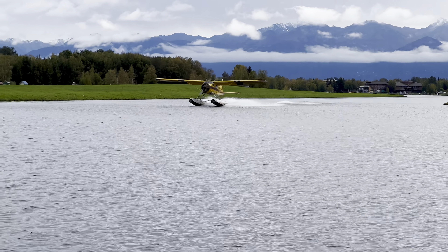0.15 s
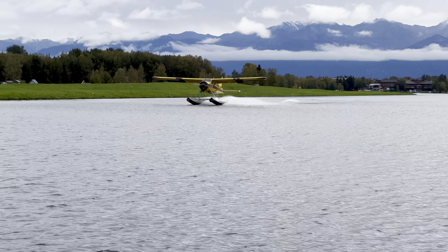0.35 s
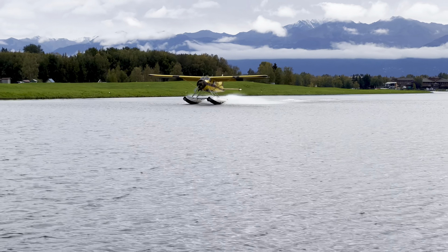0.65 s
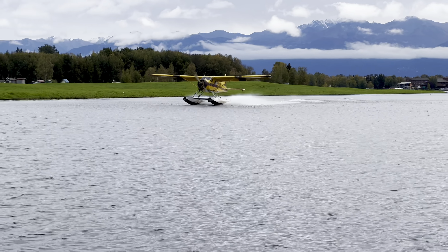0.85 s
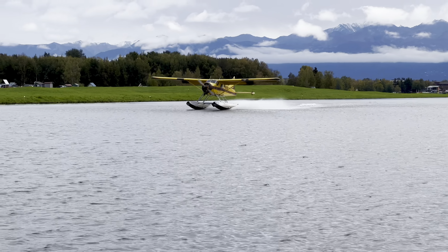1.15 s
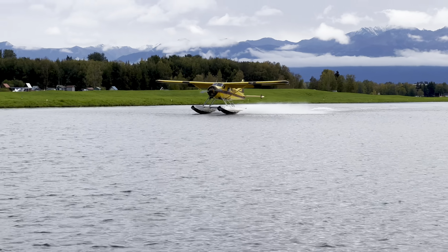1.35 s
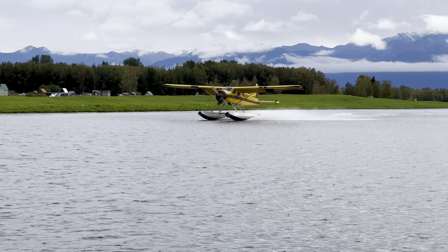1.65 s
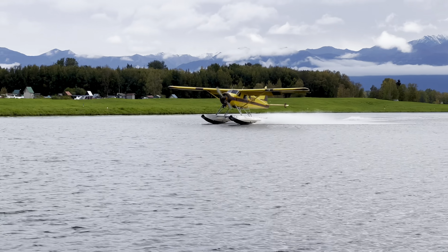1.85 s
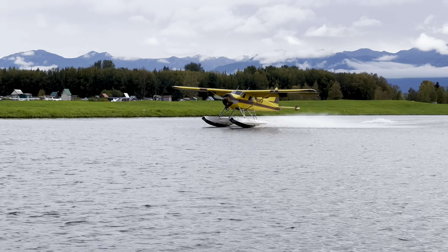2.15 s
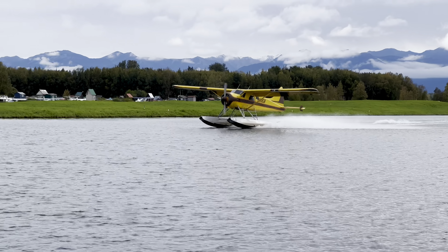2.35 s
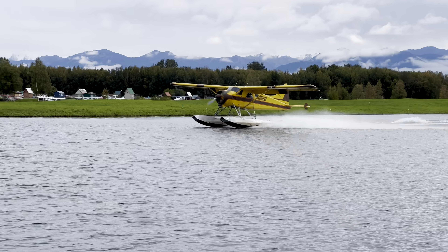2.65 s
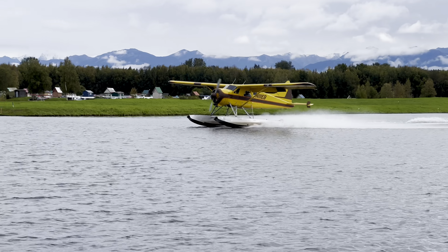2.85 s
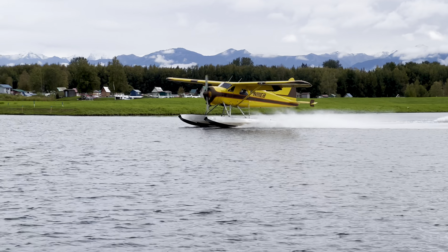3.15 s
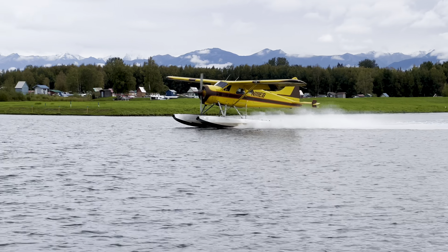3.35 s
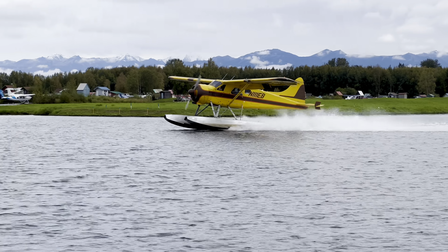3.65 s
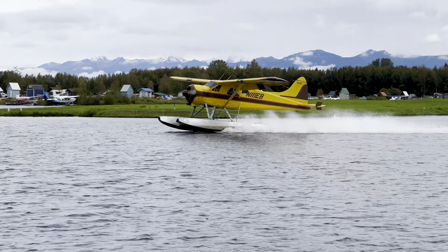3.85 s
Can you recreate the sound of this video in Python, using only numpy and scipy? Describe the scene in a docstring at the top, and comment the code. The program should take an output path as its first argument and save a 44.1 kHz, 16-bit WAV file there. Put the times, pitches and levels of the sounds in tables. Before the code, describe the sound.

Floatplane propeller engine drones low and sinks in pitch, fading under rushing water and spray

```python
"""Floatplane nearing the shore

A piston-engined floatplane skims across a lake and draws level with the shore. Sine waves make the
propeller hum, which sinks in pitch; uneven pulses and noise make the ragged exhaust, which falls to a mutter.
Flickering noise makes the rush, churning and growing spray of the floats; short noise bursts are their slaps.
Wind thumps (slow swings) and rasps (noise) on the microphone, among faint noise ticks. Noise rumbles back
from the shore, and near the end a narrow, hollow engine drone swells and eases."""
import sys
import numpy as np
from scipy import signal
from scipy.fft import rfft, irfft
from scipy.io import wavfile

SR = 44100
rng = np.random.default_rng(int(sys.argv[2]) if len(sys.argv) > 2 else 0)


def dump(signal):
    """Clip the signal to [-1, 1] and save it as 16-bit WAV at the path in sys.argv[1]."""
    limited = np.clip(np.atleast_2d(signal).T, -1, 1)
    pcm = np.round(limited * 32767).astype(np.int16)
    wavfile.write(sys.argv[1], SR, pcm)


N = 176400  # 4 seconds
TIME = np.arange(N) / SR
FREQUENCY = np.maximum(np.fft.rfftfreq(N, 1 / SR), 1)  # Hz, kept above zero


def from_db(db):
    """Turn decibels into a gain."""
    return 10 ** (np.asarray(db) / 20)


def rms_one(x):
    """Scale a signal to an average strength (rms) of 1."""
    return x / np.sqrt(np.mean(x ** 2) + 1e-20)


def in_time(rows):
    """Join the points of a table by straight lines, with a value for every sample."""
    return np.interp(TIME, *np.transpose(rows))


def gains(points):
    """Turn a table of frequencies and decibels into a gain for every frequency."""
    hz, db = np.transpose(points)
    return from_db(np.interp(np.log(FREQUENCY), np.log(hz), db))


def coloured(x, points):
    """Make some frequencies stronger than others, then scale to rms 1."""
    return rms_one(irfft(rfft(x) * gains(points), N))


def drift(rate):
    """A smooth random wander around zero with rms 1; a higher rate (Hz) wanders faster."""
    step = 40  # samples between the computed points
    r = np.exp(-2 * np.pi * rate * step / SR)
    chance = rng.standard_normal(N // step + 2002)
    slow = signal.lfilter([1], [1, -2 * r, r * r], chance)[2000:]  # drop the filter's start
    return np.interp(np.arange(N) / step, np.arange(len(slow)), rms_one(slow))


def band(x, low_hz, high_hz, order=2):
    """Keep only the frequencies between two limits, then scale to rms 1."""
    limits = [low_hz, min(high_hz, SR / 2 - 1)]
    sos = signal.butter(order, limits, "band", fs=SR, output="sos")
    return rms_one(signal.sosfilt(sos, x))


def noise():
    """Two unrelated white noises: the direct sound and its scattered part."""
    return rng.standard_normal((2, N))


def water_noise(spectrum, flutter_db, patchy_db):
    """Countless splashes: bands of noise that flicker on their own and surge together."""
    edges = np.geomspace(60, 16000, 9)
    bands = np.zeros((2, N))
    for low, high in zip(edges, edges[1:]):
        flicker = from_db(patchy_db * drift(15.0))
        bands += band(noise(), low, high) * np.sqrt(high - low) * flicker
    surge = from_db(flutter_db * drift(50))
    return rms_one(coloured(bands, spectrum) * surge)


# How often a propeller blade comes round: (t/s, f/Hz)
BLADE_RATE = [(0, 97.54), (.4, 94.56), (.9, 91.79), (1.4, 88.5), (1.9, 85.7), (2.35, 81.36), (2.65, 77.2),
              (3.15, 72.84), (3.6, 69.64), (4, 67.3)]


def blades_passed():
    """Add up the falling blade rate into a running count of blades."""
    return np.cumsum(in_time(BLADE_RATE)) / SR


# Loudness of the propeller hum: (t/s, level/dB)
HUM_LEVEL = [(0, -18), (.3, -21), (.8, -15.5), (.94, -19.5), (1.1, -14), (1.7, -18.5), (2.2, -17.5),
             (2.47, -26), (2.61, -21), (2.72, -32), (3.1, -34), (3.4, -37), (4, -35)]
HUM_WAVER_DB, HUM_WAVER_RATE_HZ, HUM_WAVER_RADIANS = 2, 12.3, 0.3
SECOND_HARMONIC_DB = -19
HUM_SCATTER_DB, HUM_SCATTER_RATE_HZ = -4.5, 4.4


def propeller(blades):
    """A nearly pure hum at the blade rate, wavering on its way over the water, and its scattered part."""
    phase = 2 * np.pi * blades + HUM_WAVER_RADIANS * drift(HUM_WAVER_RATE_HZ)
    hum = np.sin(phase) + from_db(SECOND_HARMONIC_DB) * np.sin(2 * phase)
    direct = rms_one(hum * from_db(HUM_WAVER_DB * drift(HUM_WAVER_RATE_HZ)))
    scattered = drift(HUM_SCATTER_RATE_HZ) * np.sin(phase)
    scattered += drift(HUM_SCATTER_RATE_HZ) * np.cos(phase)
    both = np.array([direct, from_db(HUM_SCATTER_DB) * scattered])
    return both * from_db(in_time(HUM_LEVEL))


# Loudness of the exhaust: (t/s, level/dB)
EXHAUST_LEVEL = [(0, -25), (.3, -22.5), (.55, -22), (.75, -21.5), (1.1, -22.5), (1.35, -22), (1.55, -18.5),
                 (1.72, -19.5), (2.2, -19), (2.58, -15.5), (2.69, -29), (2.9, -31), (3.2, -30), (3.7, -36),
                 (4, -31.5)]
# Colour the pipe gives the exhaust: (f/Hz, level/dB per Hz)
EXHAUST_COLOUR = [(20, -48), (32, -36.5), (45, -8.5), (65, 3), (100, -3.5), (140, -7.5), (200, -5.5),
                  (250, -10.5), (305, -22), (360, -14), (450, -29), (700, -33.5), (1500, -79), (9000, -77),
                  (13000, -110)]
FIRINGS_PER_BLADE = 1.5
FIRING_SPREAD_DB, FIRING_JITTER_S = 6, 0.001
GAS_SHARE = 0.68  # share of the direct power that is turbulent gas; the rest is pulses
EXHAUST_FLUTTER_DB, EXHAUST_FLUTTER_RATE_HZ = 2, 34


def exhaust(firings):
    """Uneven firing pulses and turbulent gas, coloured by the pipe."""
    at = np.flatnonzero(np.diff(np.floor(firings)))  # one pulse at each whole count
    timing, strength = rng.standard_normal((2, len(at)))
    at = np.clip(at + (FIRING_JITTER_S * SR * timing).astype(int), 0, N - 1)
    pulses = np.zeros(N)
    pulses[at] = from_db(FIRING_SPREAD_DB * np.clip(strength, -2, 2))
    gas = coloured(noise(), EXHAUST_COLOUR)
    direct = np.sqrt(1 - GAS_SHARE) * coloured(pulses - pulses.mean(), EXHAUST_COLOUR)
    direct += np.sqrt(GAS_SHARE) * gas[0]
    flutter = from_db(EXHAUST_FLUTTER_DB * drift(EXHAUST_FLUTTER_RATE_HZ))
    return rms_one(np.array([direct, gas[1]]) * flutter) * from_db(in_time(EXHAUST_LEVEL))


# Loudness of the floats rushing through the water: (t/s, level/dB)
WASH_LEVEL = [(0, -36), (.55, -35), (.75, -30.5), (.99, -36.5), (1.07, -32.5), (1.35, -33.5), (1.6, -32),
              (1.88, -30.5), (2.2, -34), (2.5, -31), (2.78, -31.5), (2.92, -34.5), (3.2, -35.5),
              (3.32, -33), (3.55, -35.5), (3.82, -33), (4, -33.5)]
# Colour of that rush: (f/Hz, level/dB per Hz)
WASH_COLOUR = [(100, -30), (300, -1), (450, -4), (600, 0.5), (900, -1), (1300, -4), (1600, -3), (1850, -8),
               (2200, -9.5), (2600, -15), (3100, -14), (4000, -20), (5200, -25.5), (6200, -28.5),
               (7500, -34), (9000, -36.5), (11000, -50), (16000, -82)]


def wash():
    """The floats rush through the water, as flickering noise."""
    return from_db(in_time(WASH_LEVEL)) * water_noise(WASH_COLOUR, flutter_db=0.87, patchy_db=0.98)


# Loudness of the deep churning behind the floats as they settle: (t/s, level/dB)
CHURN_LEVEL = [(0, -35), (2, -36.5), (2.7, -35.5), (3.05, -41), (3.35, -36), (3.7, -40), (3.82, -32),
               (4, -30.5)]
# Colour of the churning: (f/Hz, level/dB per Hz)
CHURN_COLOUR = [(70, -32), (150, -2), (220, 2), (300, 7), (380, -1.5), (460, -12), (610, -2), (780, -37),
                (1000, -36), (2000, -58.5)]


def churn():
    """Water churns behind the floats, as deep flickering noise."""
    return from_db(in_time(CHURN_LEVEL)) * water_noise(CHURN_COLOUR, flutter_db=-1.5, patchy_db=0.7)


# Loudness of the spray, which grows as the floats come nearer: (t/s, level/dB)
SPRAY_LEVEL = [(0, -54.5), (.3, -55.5), (.45, -52), (.6, -64), (.76, -51), (.95, -62), (1.1, -68),
               (1.45, -57), (1.8, -49.5), (2.25, -47.5), (2.65, -43.5), (3, -45), (3.25, -43.5),
               (3.55, -45), (3.85, -41.5), (4, -41)]
# Colour of the spray: (f/Hz, level/dB per Hz)
SPRAY_COLOUR = [(800, -16), (2000, 3.5), (3100, 2.5), (4000, 0.5), (5200, -4), (6200, -1.5), (7400, -8),
                (8700, -5.5), (9700, -12.5), (11300, -6.5), (12500, -19.5), (13500, -43), (16000, -58.5)]


def spray():
    """Fine drops hiss, as bright flickering noise."""
    return from_db(in_time(SPRAY_LEVEL)) * water_noise(SPRAY_COLOUR, flutter_db=1, patchy_db=0.56)


# Loudness of the rumble scattered back from the shore: (t/s, level/dB)
SHORE_LEVEL = [(0, -56), (1, -40.5), (2, -33.5), (2.6, -30), (3.1, -39), (3.5, -30.5), (4, -31.5)]
# Colour of that rumble: (f/Hz, level/dB per Hz)
SHORE_COLOUR = [(20, -14), (45, 4.5), (70, 8.5), (110, 4), (200, 2.5), (330, -0.5), (450, -9), (650, -6.5),
                (1000, -27.5), (2000, -29), (5000, -69), (13000, -100)]


def shore():
    """A rumble from all sides: unrelated noise in the two channels."""
    return from_db(in_time(SHORE_LEVEL)) * coloured(noise(), SHORE_COLOUR)


# Deep wind thumps: (t/s at the top, half length/s, level/dB, f/Hz)
THUMPS = [(0.397, 0.02, -20, 63), (0.576, 0.023, -24, 59.6), (1.57, 0.019, -27, 59.6),
          (1.69, 0.013, -19.5, 65), (1.851, .02, -12.5, 70), (2.396, .022, -19, 63.3),
          (2.577, 0.052, -17.5, 71.3), (3.982, 0.006, -24.5, 153)]
THUMP_WAVER_RATE_HZ, THUMP_WAVER_RADIANS = 62, 0.3


def thumps():
    """Large eddies push on the microphone: a few slow swings of pressure each."""
    waver = THUMP_WAVER_RADIANS * np.array([drift(THUMP_WAVER_RATE_HZ), drift(THUMP_WAVER_RATE_HZ)])
    waver += rng.uniform(0, 2 * np.pi, (2, 1))
    out = np.zeros((2, N))
    for s, half, db, hz in THUMPS:
        swell = np.exp(-.5 * ((TIME - s) / half) ** 2)
        swing = np.sqrt(2) * np.sin(2 * np.pi * hz * (TIME - s) + waver)
        out += from_db(db) * swell * swing
    return out


# Faint ticks near the microphone: (t/s, level/dB at the start)
TICKS = [(0.408, -33.5), (0.422, -37), (0.436, -35.5), (1.055, -44), (1.4375, -36), (2.023, -46)]
# Colour of a tick: (f/Hz, level/dB per Hz)
TICK_COLOUR = [(1000, -8), (2500, 14.5), (5000, -3), (7500, 4), (9000, -2), (12500, -10.5), (15500, -20)]
TICK_FADE_S = 0.0036


def ticks():
    """Thin, sharp ticks close by: bright noise that starts at once and quickly dies away."""
    envelope = np.zeros(N)
    for s, db in TICKS:
        envelope += from_db(db) * (TIME >= s) * np.exp(-np.abs(TIME - s) / TICK_FADE_S)
    return coloured(noise(), TICK_COLOUR) * envelope


# Wind rasps on the microphone: (t/s, length/s, level/dB, centre f/Hz)
BUFFETS = [(0.554, 0.018, -25.5, 253), (1.765, .012, -22.5, 287), (1.83, 0.026, -18.5, 375),
           (2.006, 0.025, -26, 320), (2.297, .024, -21, 335), (2.352, 0.0064, -15.5, 376),
           (2.427, 0.034, -16, 388), (2.464, 0.013, -11.5, 370), (2.487, 0.024, -17.5, 380),
           (2.52, 0.038, -22, 380), (2.563, .08, -24, 238), (2.655, 0.0076, -20.5, 310),
           (2.679, 0.027, -21, 420), (2.71, 0.0089, -18.5, 458), (2.726, 0.018, -21, 408),
           (2.763, .006, -20, 400), (2.77, 0.011, -21, 480), (2.792, 0.0078, -17.5, 466),
           (2.846, 0.01, -22.5, 413)]
# Colour of a rasp: (multiple of the centre frequency, level/dB per Hz)
BUFFET_COLOUR = [(.1, -17), (.35, -2.5), (.8, 2.5), (1.35, -2.5), (1.9, -13), (2.6, -22), (5, -54),
                 (15, -79)]
BUFFET_ATTACK_S, BUFFET_RELEASE_S = 0.0052, 0.011
BUFFET_RAGGED_DB, BUFFET_RAGGED_RATE_HZ = 1, 87


def buffets():
    """Wind rasps across the microphone: short, ragged pieces of noise."""
    out = np.zeros((2, N))
    air = noise()
    ragged = from_db(BUFFET_RAGGED_DB * drift(BUFFET_RAGGED_RATE_HZ))
    for s, length, db, hz in BUFFETS:
        attack = np.clip((TIME - s) / BUFFET_ATTACK_S, 0, 1)
        release = np.exp(-np.maximum(TIME - s - length, 0) / BUFFET_RELEASE_S)
        envelope = attack * release
        colour = [(hz * multiple, level) for multiple, level in BUFFET_COLOUR]
        rasp = coloured(air, colour) * envelope * ragged
        # give both channels the energy of the envelope
        energy_ratio = np.sum(envelope ** 2) / np.sum(rasp ** 2, axis=1, keepdims=True)
        out += from_db(db) * rasp * np.sqrt(energy_ratio)
    return out


# Floats slapping on ripples: (t/s, level/dB at the start, centre f/Hz)
SLAPS = [(0.784, -20.5, 905), (1.081, -17.5, 980), (1.947, -22, 1300), (3.497, -22, 611),
         (3.654, -19.5, 213), (3.66, -24, 585), (3.672, -29, 593), (3.778, -34, 425)]
SLAP_DECAY_S = 0.003


def slaps():
    """The floats slap on ripples: sudden puffs of band noise that die away."""
    out = np.zeros((2, N))
    splash = noise()
    for s, db, hz in SLAPS:
        envelope = (TIME >= s) * np.exp(-np.abs(TIME - s) / SLAP_DECAY_S)
        puff = band(splash * envelope + 1e-18, hz * 0.8, hz * 1.18)
        out += from_db(db) * puff * np.sqrt(np.mean(envelope ** 2))
    return out


# Hollow engine drone as the aircraft draws level: (t/s, centre f/Hz, level/dB)
DRONE = [(3.7, 250, -47), (3.801, 242.4, -32.5), (3.869, 283.5, -27), (3.93, 298.8, -34), (4, 318, -39.5)]
DRONE_DRIFT_RATE_HZ = 17  # a faster drift makes the band wider


def drone():
    """A narrow band of engine noise: tones of wandering strength that climb, swell and ease."""
    s, hz, db = np.transpose(DRONE)
    phase = 2 * np.pi * np.cumsum(np.interp(TIME, s, hz)) / SR
    paths = []
    for _ in range(2):
        tone = drift(DRONE_DRIFT_RATE_HZ) * np.sin(phase) + drift(DRONE_DRIFT_RATE_HZ) * np.cos(phase)
        paths.append(rms_one(tone))
    return np.array(paths) * from_db(np.interp(TIME, s, db)) * (TIME > s[0])


# Colour of the summed microphones, with a notch high up: (f/Hz, level/dB)
MIC_COLOUR = [(8800, 0.5), (9600, -4.5), (10200, -22), (10700, -9), (11300, -8)]
# Stereo width, as side gain: (f/Hz, level/dB)
WIDTH = [(30, -6.5), (80, -15.5), (140, -13), (350, -19), (700, -15), (1400, -17), (2400, -19.5),
         (3100, -7), (4000, -10), (5000, -12), (5500, -45), (7300, -40), (7800, -26.5), (8500, -24.5),
         (9000, 0), (11000, -4.5), (12000, -20.5), (16000, -12)]
# Stereo balance, left minus right: (f/Hz, level/dB)
BALANCE = [(100, 0), (500, -0.51), (1000, -1.9), (2000, -0.64), (8000, 1)]
PORTS_HZ = 2500  # well above this the two microphone ports hear the sound out of phase


def scene():
    """The aircraft stays in the middle; scatter widens the lows, a phase shift between ports the highs."""
    blades = blades_passed()
    engine = propeller(blades) + exhaust(FIRINGS_PER_BLADE * blades) + drone()
    floats = wash() + churn() + spray() + slaps()
    near_microphone = thumps() + ticks() + buffets()
    direct, scattered = rfft(engine + floats + near_microphone)
    treble = 1 / (1 + (PORTS_HZ / FREQUENCY) ** 4)  # rises from 0 to 1
    mid = direct * gains(MIC_COLOUR)
    # 1j shifts the sound by a quarter of a cycle
    side = (1j * np.sqrt(treble) * direct + np.sqrt(1 - treble) * scattered) * gains(WIDTH)
    lean = np.sqrt(gains(BALANCE))  # half of the balance goes to each channel
    left, right = (mid + side) * lean, (mid - side) / lean
    return irfft(np.array([left, right]), N) + shore()


CUTOFF_HZ, FADE_IN_S = 16000, .004


def record(dry):
    """Start softly and cut the top steeply."""
    fade = np.minimum(TIME / FADE_IN_S, 1)
    top_cut = signal.cheby2(12, 60, CUTOFF_HZ, fs=SR, output="sos")  # 60 dB down from the cutoff
    return signal.sosfilt(top_cut, dry * fade)


dry = scene()
out = record(dry)
dump(out)
```